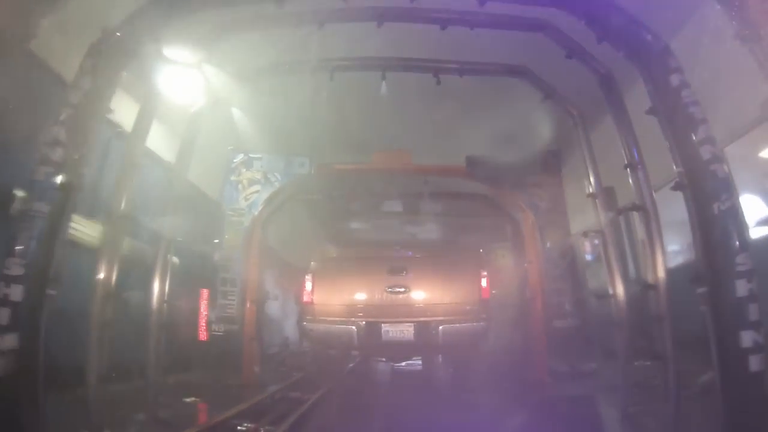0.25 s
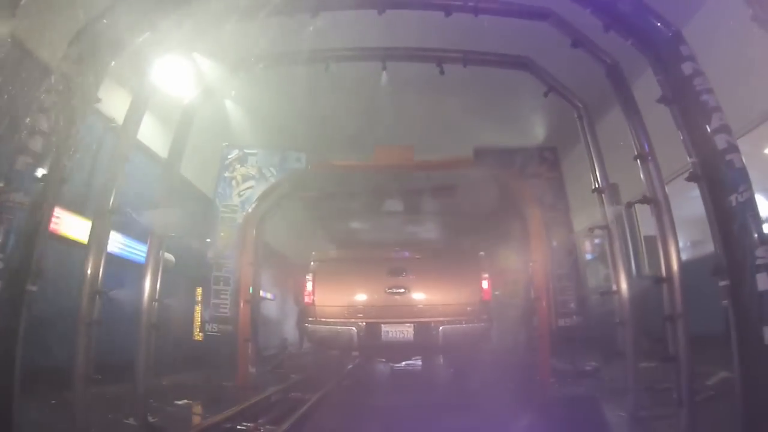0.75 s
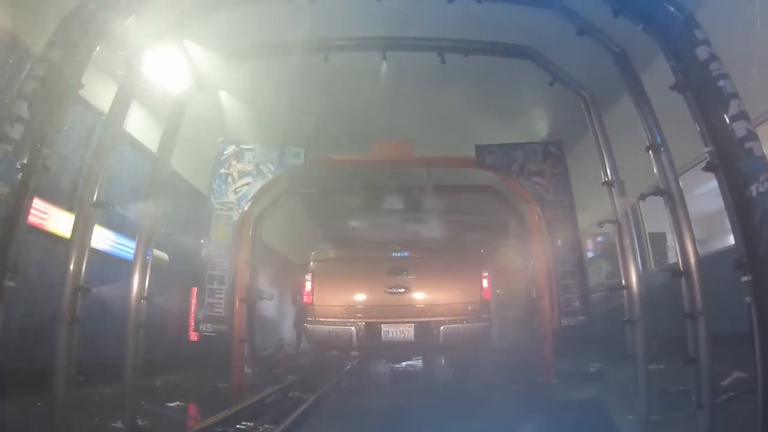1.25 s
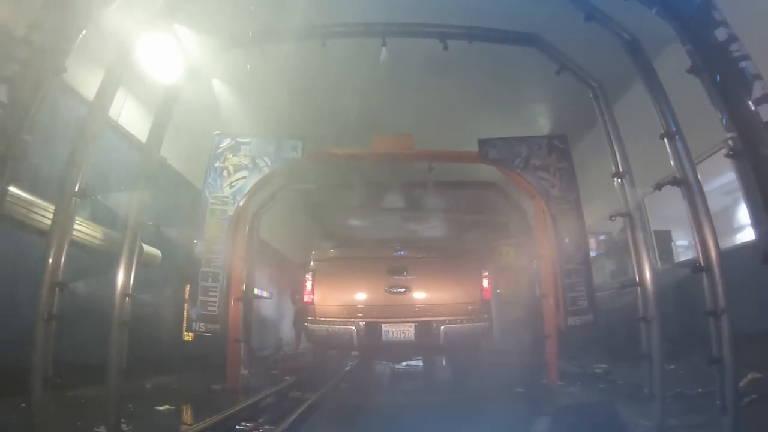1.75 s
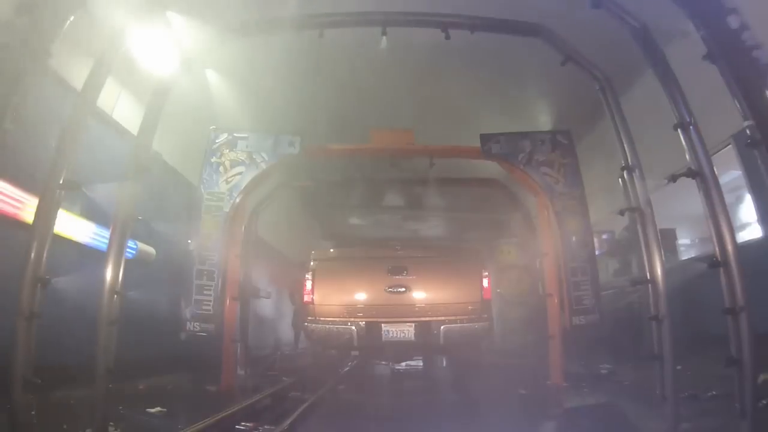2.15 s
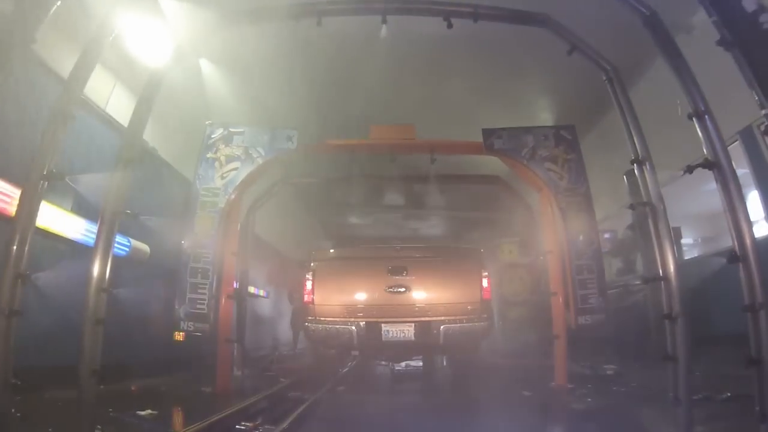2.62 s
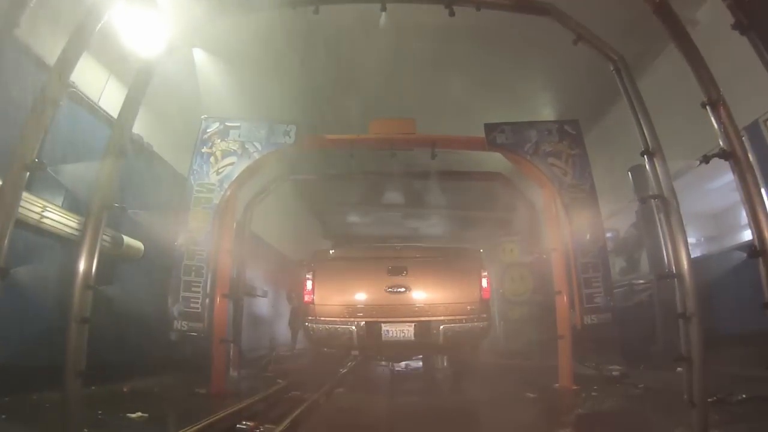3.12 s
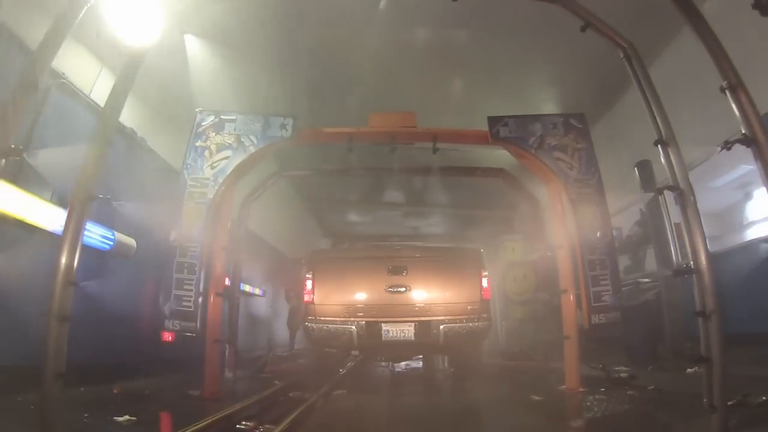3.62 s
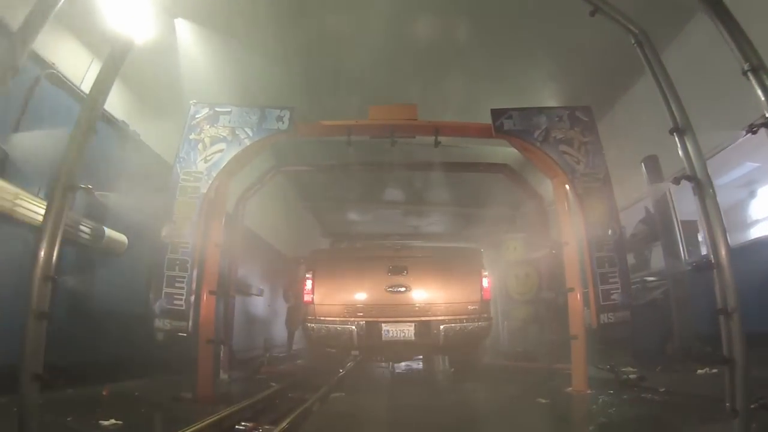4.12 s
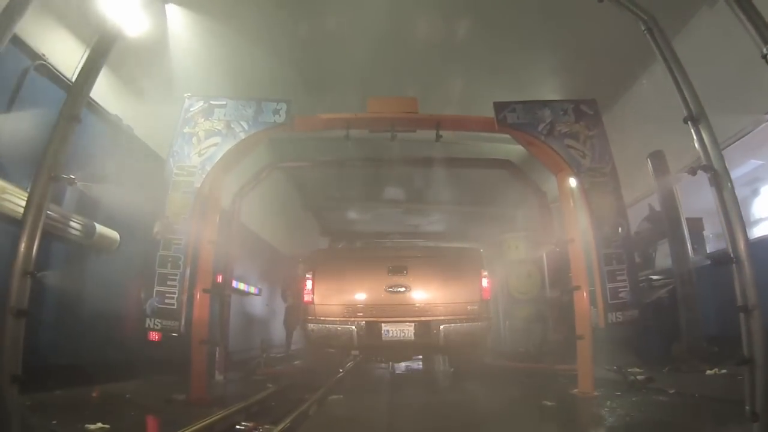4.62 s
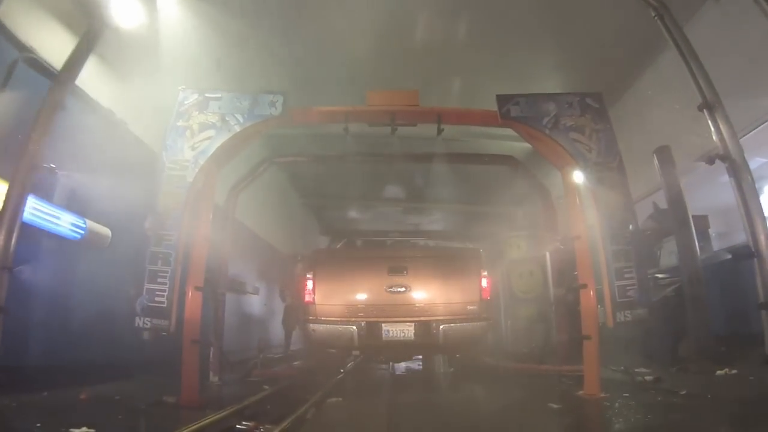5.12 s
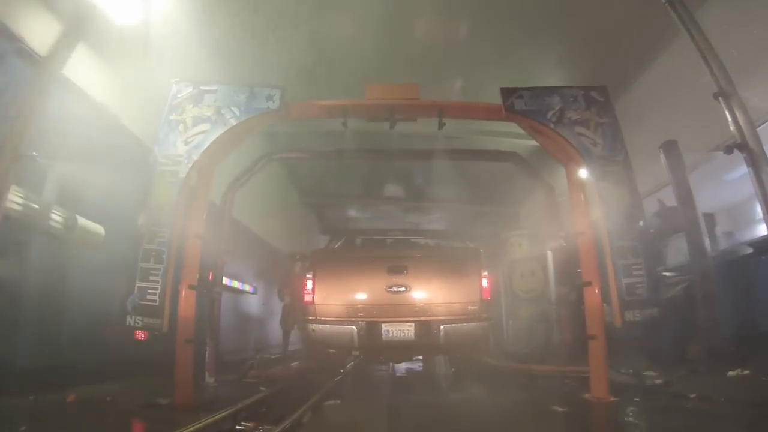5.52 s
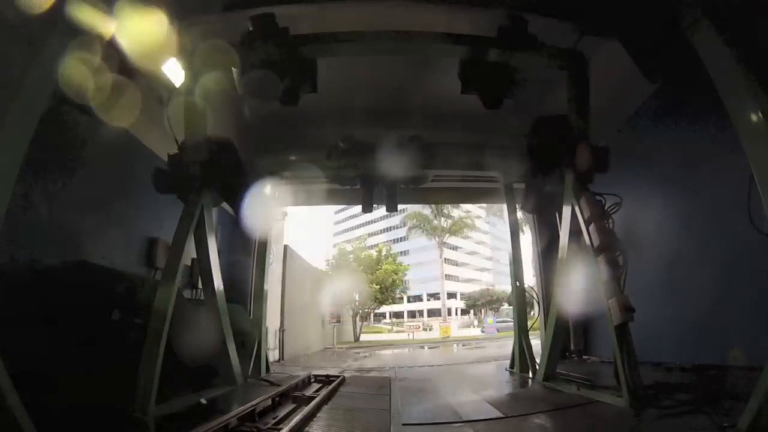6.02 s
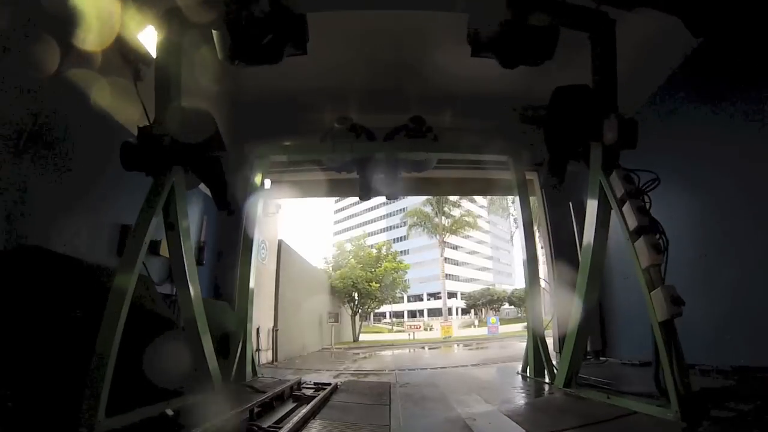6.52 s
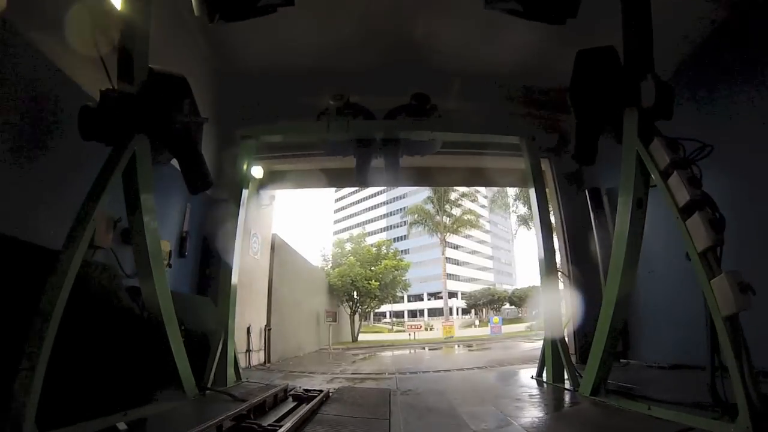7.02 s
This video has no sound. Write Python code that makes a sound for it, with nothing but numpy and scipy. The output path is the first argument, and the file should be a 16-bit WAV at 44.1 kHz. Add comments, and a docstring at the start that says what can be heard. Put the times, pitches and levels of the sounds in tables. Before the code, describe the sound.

From inside a closed car in an automatic wash tunnel, machinery rumbles deeply and brushes thud against the body while muffled sprays hiss through the windows. Rinse water patters on the windscreen, with bigger drops knocking on the glass, heaviest midway. Near the end the dryer takes over, much louder: a fluttering, howling roar with gusts of hissing air, flung water and dull thumps on the body panels.

```python
"""Inside a car in a wash tunnel

Machinery rumbles and brushes thud in the cabin's bass resonances, distant sprays hiss through the
windows and rinse water patters on the windscreen. Then the car rolls into the dryer: its air jet howls
with a flutter, rings and thumps the body panels and hisses over the glass in gusts.
A limiter holds the peaks down."""
import sys
import numpy as np
from scipy import signal
from scipy.fft import rfft, irfft
from scipy.io import wavfile
from scipy.ndimage import uniform_filter1d, minimum_filter1d

SR = 44100
rng = np.random.default_rng(int(sys.argv[2]) if len(sys.argv) > 2 else 0)


def to_wav(s):
    """Save 16-bit WAV."""
    ch = np.atleast_2d(s).T  # columns
    pcm = np.round(np.clip(ch, -1, 1) * 32767)  # PCM
    wavfile.write(sys.argv[1], SR, pcm.astype(np.int16))


N = 320151
TIME = np.arange(N) / SR
JET_EDGE_S, JET_CORE_S = 5.702, 6.196  # the jet touches the car, then hits it fully

# response of the windscreen to a drop: (frequency [Hz], relative level [dB])
GLASS_RESPONSE = [(300, -8), (900, -2), (1500, 2), (2600, 4), (3200, -2), (5300, -3.5), (6900, -1),
                  (9000, -11.5), (11000, -6.5), (13000, -12), (15500, -20)]


def undb(db):
    """Amplitude ratio of a level in decibels."""
    return 10 ** (np.asarray(db) / 20)


def unit(x):
    """Normalisation to rms 1."""
    return x / np.sqrt(np.mean(x ** 2))


def unit_attack(x):
    """Normalisation of a transient to rms 1 over its first 4 ms."""
    return x / np.sqrt(np.mean(x[:int(.004 * SR)] ** 2))


def add(out, s, hit):
    """Superposition of a transient at time s."""
    start = int(s * SR)
    out[start:start + len(hit)] += hit[:N - start]


def curve(table):
    """Linear interpolation of (time, value) rows at every sample."""
    return np.interp(TIME, *np.transpose(table))


def during(start, end, edge):
    """Soft-edged gate, open from start to end."""
    return (np.tanh((TIME - start) / edge) - np.tanh((TIME - end) / edge)) / 2


def moments(times, length):
    """Gaussian pulses of height 1 and about the given length, one at each time."""
    return sum(np.exp(-(2 * (TIME - s) / length) ** 2) for s in times)


def walk(rate):
    """Random modulation: noise low-passed at rate [Hz], rms 1."""
    f = np.fft.rfftfreq(N, 1 / SR)
    return unit(irfft(rfft(rng.standard_normal(N)) / (1 + (f / rate) ** 2), N))


def butterworth(x, order, hz, kind):
    """Causal filter with a maximally flat passband."""
    return signal.sosfilt(signal.butter(order, hz, kind, fs=SR, output="sos"), x)


def colour(x, points, size=8192):
    """Minimum-phase filter with the given (frequency, level) outline and unit power gain."""
    hz, db = np.transpose(points)
    f = np.fft.rfftfreq(size, 1 / SR)
    magnitude = undb(np.interp(np.log(f + 1), np.log(hz), db))
    cepstrum = irfft(np.log(magnitude))
    cepstrum[1:size // 2] *= 2
    cepstrum[size // 2 + 1:] = 0
    impulse_response = irfft(np.exp(rfft(cepstrum)))
    return signal.fftconvolve(x, impulse_response / np.linalg.norm(impulse_response))[:len(x)]


def resonate(modes, order=2):
    """Noise-driven (frequency, width, level) resonances, steeper-sided at higher order; rms 1."""
    f = np.fft.rfftfreq(N, 1 / SR) + 1e-9
    power = 0
    for hz, width, db in modes:
        detuning = (f - hz * hz / f) / (2 * width)
        power += undb(db) ** 2 / (1 + 2 / order * detuning ** 2) ** order
    return unit(irfft(rfft(rng.standard_normal(N)) * np.sqrt(power), N))


def steady(x, seconds, share):
    """Envelope flattening: a constant drive evens out a share of a resonance's swells; rms 1."""
    size = int(seconds * SR) + 1
    power = uniform_filter1d(uniform_filter1d(x ** 2, size), size)
    return unit(x / np.abs(power) ** (share / 2))


def tone(hz, waver, rate):
    """A sinusoid under random amplitude and phase modulation at rate [Hz]; rms 1."""
    shake = 1 + waver * (walk(rate) + 1j * walk(rate))
    return unit(np.real(shake * np.exp(2j * np.pi * hz * TIME)))


def tap(hz, t60, size=1024):
    """Damped free vibration of a struck plate, building up over its first cycle."""
    t = np.arange(size) / SR
    onset = 1 - np.exp(-hz * t)
    return unit_attack(np.sin(2 * np.pi * hz * t) * onset * np.exp(-np.log(1000) * t / t60))


def splash(low_hz, high_hz, t60, size=1024):
    """Impact noise: the tiny impacts of bursting water merge into a decaying band of noise."""
    cluster = rng.standard_normal(size) * np.exp(-np.log(1000) * np.arange(size) / SR / t60)
    return unit_attack(butterworth(cluster, 2, [low_hz, high_hz], "band"))


def patter(per_second, spread_db):
    """Shot noise: random drops, mostly tiny, excite the glass, each with a trace of spatter."""
    lands = rng.random(N) < per_second / SR
    strength = undb(spread_db * np.minimum(rng.exponential(size=N), 3.2))
    hits = lands * strength * rng.choice([-1, 1], N)
    spatter_power = signal.lfilter([1], [1, -np.exp(-1 / (.0004 * SR))], hits ** 2)
    spatter = undb(-18) * np.sqrt(spatter_power) * rng.standard_normal(N)
    return colour(hits + spatter, GLASS_RESPONSE)


def water_flow(drizzle_db=-67.5):
    """Incoherent addition: showers and stray drizzle sum in power to the water's amplitude."""
    # showers of rinse water that the car passes through: (start [s], end [s], relative level [dB])
    showers = [(-.1, 1.94, -64), (.66, 1.21, -67), (2.58, 3.76, -56), (3.0, 3.62, -55.5),
               (3.13, 3.22, -51.5)]
    power = sum(undb(db) ** 2 * during(start, end, edge=.05) for start, end, db in showers)
    return np.sqrt(undb(drizzle_db) ** 2 + power)


def jet_exposure(power, edge_s=JET_EDGE_S):
    """Power-law rise, 0 to 1, as the car enters the jet; a higher power needs more of its core."""
    return np.clip((TIME - edge_s) / (JET_CORE_S - edge_s), 0, 1) ** power


def nozzle(start_db=-69, fade_db_per_s=2):
    """Attenuation with distance: the thin hiss of a fine nozzle fades as the car leaves it behind."""
    return resonate([(11000, 980, 0)]) * undb(start_db - fade_db_per_s * TIME)


def machinery(boom_band_hz=(63, 130), thud_half_s=0.035):
    """Forced cavity resonance: pumps and brushes drive the cabin's modes, over faint motor tones."""
    # machinery rumble, left behind at the dryer: (time [s], drive level [dB])
    rumble_levels = [(0, -33), (1.45, -33), (1.98, -30), (2.08, -35.5), (4.15, -38.5), (5.3, -33.5),
                     (6.2, -37.5), (6.4, -62)]
    # brushes striking the body: (time [s], drive level [dB])
    brush_thuds = [(.22, -26.5), (.76, -36), (.88, -33), (1.17, -30), (1.26, -28), (1.43, -25),
                   (1.60, -29.5), (1.77, -31), (1.88, -33), (2.24, -33.5), (2.37, -32), (2.59, -32),
                   (2.99, -28), (3.16, -28.5), (3.30, -33), (3.57, -34), (3.70, -33.5), (3.88, -33),
                   (4.03, -33.5), (5.14, -32), (5.52, -30.5)]
    # bass modes of the cabin: (frequency [Hz], width [Hz], relative level [dB])
    cabin_modes = [(85.5, 6.5, -1.5), (105.7, 4.2, -2.5), (113.7, 10.1, 1.5), (99.5, 180, -18.5)]
    # steady pump motors: (frequency [Hz], level [dB])
    motor_tones = [(39.5, -62), (323, -61.5)]
    thuds = sum(undb(db) * moments([s], 2 * thud_half_s) for s, db in brush_thuds)
    drive = np.hypot(undb(curve(rumble_levels)), thuds)
    boom = steady(resonate(cabin_modes, order=4), seconds=0.086, share=1.0) * drive
    boom = butterworth(boom, 2, boom_band_hz, "band")
    next_mode = resonate([(201, 38, 0)]) * drive * undb(-25)
    motors = sum(tone(hz, waver=hz / 900, rate=hz / 80) * undb(db) for hz, db in motor_tones)
    return boom + next_mode + motors


def sprays(wash_db=-43.5, window_db=-48.5):
    """Transmission loss: the windows dull the distant sprays and ring, more so under rinse water."""
    # sprays through the closed windows: (frequency [Hz], relative level [dB])
    wash_spectrum = [(30, -4), (60, -0.5), (180, -5), (250, -1), (325, 2), (520, 0.8), (1020, -6),
                     (1250, -1), (1580, 2.5), (1850, -5.5), (2450, -3.5), (3000, -13), (4300, -17),
                     (7000, -21), (9000, -29.5), (11300, -34), (12500, -37), (16000, -38)]
    # side window resonances: (frequency [Hz], width [Hz], relative level [dB])
    window_modes = [(1214, 36, 1), (1391, 55, 4.5), (1576, 28, 0), (2167, 176, -0.5), (3700, 224, -11)]
    wash = colour(rng.standard_normal(N), wash_spectrum) * undb(wash_db + .5 * walk(8.2))
    drive = np.hypot(undb(window_db), water_flow() * undb(5))
    panes = resonate(window_modes) * drive * undb(1.5 * walk(6.1))
    return wash + panes


def rinse(fine_db=-2.0, soft_db=4.0, mist_db=-12.5):
    """Random impacts on the windscreen: fine drops tick, soft splats sound dull and mist sizzles."""
    fine = butterworth(patter(per_second=340, spread_db=5.7), 1, 3200, "high")
    soft = butterworth(patter(per_second=750, spread_db=5.5), 2, [1500, 6200], "band")
    mist = butterworth(colour(rng.standard_normal(N), GLASS_RESPONSE), 2, 3500, "high")
    water = unit(fine) * undb(fine_db) + unit(soft) * undb(soft_db) + unit(mist) * undb(mist_db)
    clustering = undb(1.8 * walk(22))
    return water * water_flow() * clustering


def drops():
    """Impulse excitation: each big drop rings the glass at a pitch set by where it lands, and bursts."""
    # big drops on the windscreen, from the arches in the wash and, from 5.75 s, driven by the jet, levels
    # relative: (time [s], knock [dB], splat [dB], fine spatter [dB])
    big_drops = [(0.0312, -41, -44, -56), (0.418, -48, -44, -56), (0.676, -46, -44, -60),
                 (0.6894, -50, -48, -64), (0.731, -46, -50, -63), (0.7605, -43, -45, -62),
                 (0.9644, -47, -47, -62), (1.1796, -48, -43, -58), (1.2492, -53, -45.5, -61),
                 (1.279, -43, -46, -59), (1.3469, -54, -47, -51), (1.555, -42, -42.5, -56),
                 (1.6786, -34, -36, -45.5), (2.5707, -36, -40, -53), (2.6515, -41, -43, -58),
                 (2.6776, -34.5, -55, -44.5), (3.052, -35.5, -50, -60), (3.1357, -40, -46, -56),
                 (3.1486, -41, -44, -46), (3.1722, -37, -39, -57), (3.1938, -38, -42, -59),
                 (3.2744, -43, -42, -47), (3.381, -39, -43, -52), (3.39, -42, -41, -55),
                 (3.5253, -40, -46, -55), (3.5516, -32.5, -43, -47), (3.569, -37.5, -48, -54),
                 (3.6102, -43, -41, -49), (3.6432, -43, -38, -56), (3.7125, -40, -45, -53),
                 (3.8162, -38.5, -46, -60), (3.9533, -42, -47, -58), (5.7533, -46, -46, -63),
                 (5.8033, -52, -42, -60), (5.838, -42, -48, -57), (5.8868, -40, -42, -55),
                 (6.023, -34, -30, -54), (6.067, -39, -38, -45), (6.07, -28.5, -47, -46),
                 (6.3746, -47, -36, -33)]
    out = np.zeros(N)
    for s, knock_db, splat_db, spatter_db in big_drops:
        knock = .4 * tap(rng.uniform(1400, 2700), t60=.01) + .9 * splash(750, 3000, t60=.006)
        splat = splash(3200, 6740, t60=0.007) * undb(splat_db - 0.9)
        spatter = splash(10200, 12700, t60=0.0037) * undb(spatter_db)
        add(out, s, knock * undb(knock_db + 1) + splat + spatter)
    return out


def blown_droplets(level_db=-48.5):
    """Shot noise: fine droplets carried by the jet crackle on the glass, from its very edge on."""
    ticks = butterworth(patter(per_second=420, spread_db=5), 2, 2800, "high")
    return unit(ticks) * jet_exposure(power=1.1) * undb(level_db)


def flung_water(clear_s=6.16, gain_db=-35.5, rise_db_per_s=36, fall_db_per_s=200):
    """Air drag: the jet flings standing water over the windscreen, ever harder until the glass clears."""
    fade_db = np.maximum(rise_db_per_s * (clear_s - TIME), fall_db_per_s * (TIME - clear_s))
    spray = butterworth(unit(patter(per_second=1000, spread_db=4.0)), 1, 3800, "low")
    return spray * (TIME > JET_EDGE_S) * undb(gain_db - fade_db)


def thumps(modes_hz=(190, 280), slap_db=-7.5):
    """Damped plate vibration: slugs of air and water slap the bonnet and its sheet metal rings dully."""
    # slugs hitting the bonnet: (time [s], level [dB])
    slugs = [(6.16, -21), (6.265, -25), (6.298, -27), (6.374, -19), (6.389, -27), (6.491, -24),
             (6.605, -21.5), (6.839, -24.5), (6.876, -23), (6.91, -23.5), (7.231, -27)]
    out = np.zeros(N)
    for s, db in slugs:
        ring = sum(tap(hz * rng.uniform(.85, 1.15), t60=.035, size=4096) for hz in modes_hz) / 2
        slap = splash(550, 1400, t60=.03, size=4096)
        add(out, s, (ring + slap * undb(slap_db)) * undb(db))
    return out


def air_rush(buffet_db=-24, hiss_db=-39.5, lull_db=-8.5, reaches_glass_s=5.785, leaves_glass_s=6.8):
    """Turbulent flow noise: gusts buffet the body and hiss on the glass, easing as the jet moves on."""
    # hard gusts of the jet: (time [s], length [s], boost [dB])
    gusts = [(6.174, 0.082, 4.5), (6.401, 0.02, 3), (6.533, 0.064, 4), (6.655, 0.02, 4.5),
             (6.85, 0.044, 4.5), (7.243, 0.024, 5)]
    # brief lulls in the rush of air: (time [s])
    lulls = [6.12, 6.335, 6.477, 6.825, 6.935, 7.208]
    # turbulence on the body: (frequency [Hz], relative level [dB])
    buffet_spectrum = [(30, -38), (70, -11), (140, -2), (230, 3), (330, 4), (480, 7.5), (570, -1.5),
                       (800, -10), (950, -12.5), (1060, -11.5), (1130, -13), (1280, -11), (1420, -25),
                       (3000, -37)]
    # air over the glass: (frequency [Hz], relative level [dB])
    hiss_spectrum = [(1000, -9), (2200, -1), (2900, -9.5), (3400, 0.5), (4150, -10.5), (4750, 1.5),
                     (5200, -0.5), (5600, 5), (7500, -5), (8700, 1.5), (10000, -3.5), (11200, -2),
                     (11900, -12), (12900, -8), (16000, -10)]
    past_s = np.maximum(TIME - leaves_glass_s, 0)
    gust_db = sum(db / (1 + (2 * (TIME - s) / length) ** 4) for s, length, db in gusts)
    gust_db += 2.5 * walk(58)  # flutter
    gust_db += lull_db * moments(lulls, length=0.019)
    # a gust stirs the small eddies more than the large, low ones
    eddies = colour(rng.standard_normal(N), buffet_spectrum)
    rumble = signal.sosfiltfilt(signal.butter(3, 520, fs=SR, output="sos"), eddies)
    buffet = rumble * undb(0.66 * gust_db) + (eddies - rumble) * undb(gust_db)
    buffet *= undb(buffet_db - 10.5 * past_s)
    # water torn off the glass makes the hiss grainy and comes in spurts
    grain = unit(rng.standard_normal(N) * undb(walk(900)))
    spurts = undb(1.95 * walk(120))
    hiss = colour(grain * spurts, hiss_spectrum) * undb(hiss_db + 0.61 * gust_db - 7 * past_s)
    return buffet * jet_exposure(power=2.4) + hiss * jet_exposure(power=0.66, edge_s=reaches_glass_s)


def howl(eddies_per_s=45, ring_s=0.015, hold=0.8):
    """Perturbed oscillation: eddies kick the jet's tone at uneven intervals; it relaxes after each."""
    # pitch of the howl: (time [s], frequency [Hz])
    pitch_track = [(6.3, 455.7), (6.44, 465), (6.58, 447), (6.75, 448.2), (7.15, 458.7)]
    times = np.cumsum(rng.gamma(4, 1 / (4 * eddies_per_s), size=600))
    kick_samples = (times[times < N / SR] * SR).astype(int)
    kicks = np.zeros(N, complex)
    kicks[kick_samples] = np.exp(1j * rng.standard_normal(len(kick_samples)))
    flutter = signal.lfilter([1], [1, -np.exp(-1 / (ring_s * SR))], uniform_filter1d(kicks, size=90))
    carrier = np.exp(2j * np.pi * np.cumsum(curve(pitch_track)) / SR)
    return unit(np.real((hold + flutter) * carrier))


def body_roar(roar_db=-17.5, howl_db=-2, surge_db=9, lift_db=1.5, stall_db=-16.5):
    """Forced vibration: the howling jet rings the body panels, which sink whenever the howl surges."""
    # panel modes, the strongest first: (frequency [Hz], width [Hz], relative level [dB])
    panel_modes = [(417.8, 17, -2), (323.8, 14, -5), (367.5, 19, -6.5), (468, 15, -2.5), (526, 9.7, -14),
                   (1068, 7.1, -23)]
    # the howl takes hold and drowns the panels: (start [s], end [s])
    howl_surges = [(6.068, 6.125), (6.205, 6.252), (6.266, 6.35), (6.38, 6.468), (6.495, 6.545),
                   (6.565, 6.59), (6.709, 6.765), (6.845, 6.88), (6.9, 6.93), (6.964, 7.02), (7.06, 7.21)]
    # the whole roar stalls for an instant: (time [s])
    stalls = [5.3, 6.828, 7.222]
    surge = sum(during(start, end, edge=0.0045) for start, end in howl_surges)
    # the jet's edge rings only the strongest panel, its core all of them
    strongest = steady(resonate(panel_modes[:1]), seconds=0.032, share=0.7)
    others = steady(resonate(panel_modes[1:]), seconds=0.031, share=0.59)
    panels = unit(strongest + jet_exposure(power=0.83) * others)
    roar = steady(panels + howl() * undb(howl_db + surge_db * surge), seconds=0.036, share=0.93)
    level_db = roar_db + lift_db * surge + stall_db * moments(stalls, length=0.014)
    return roar * jet_exposure(power=0.9) * undb(level_db)


def scene():
    """Superposition of wash and dryer behind the windscreen, in one channel."""
    wash = machinery() + sprays() + nozzle() + rinse() + drops()
    dryer = body_roar() + air_rush() + thumps() + flung_water() + blown_droplets()
    return (wash + dryer)[None]


def record(dry, ceiling_db=-6, top_hz=15700):
    """Peak and band limiting: a fast gain dip holds the dryer down and a steep low-pass cuts the top."""
    wanted = np.minimum(1, undb(ceiling_db) / (np.abs(dry) + 1e-9))
    gain = uniform_filter1d(minimum_filter1d(wanted, size=400), size=400)
    return signal.sosfilt(signal.ellip(12, .2, 95, top_hz, fs=SR, output="sos"), dry * gain)


dry = scene()
out = record(dry)
to_wav(out)
```